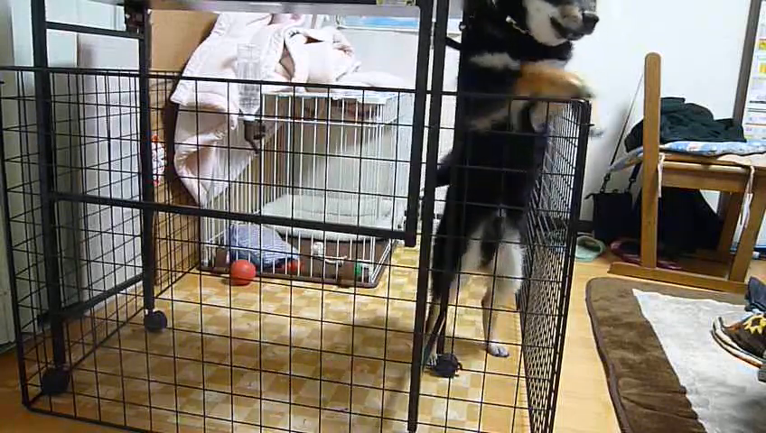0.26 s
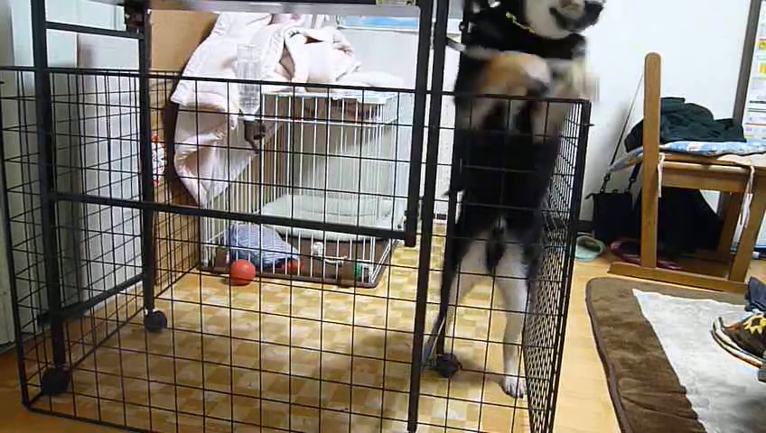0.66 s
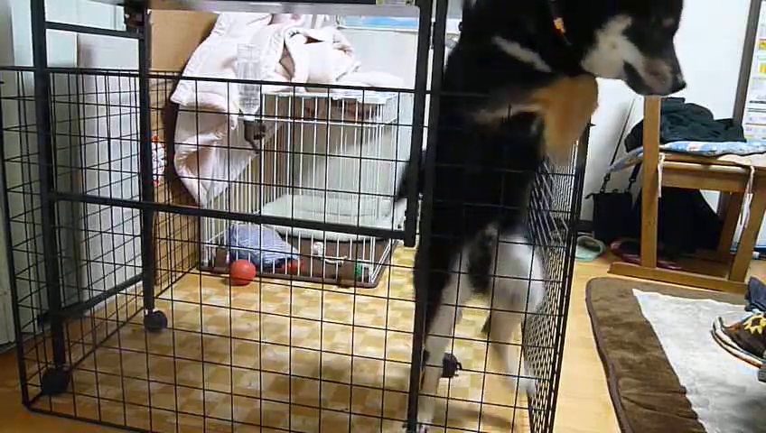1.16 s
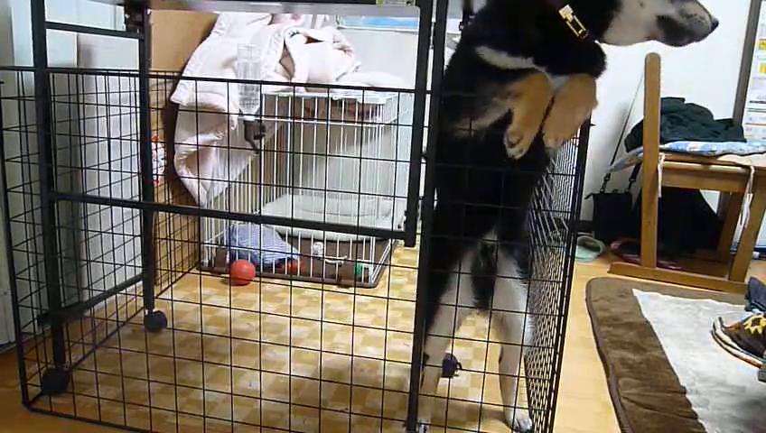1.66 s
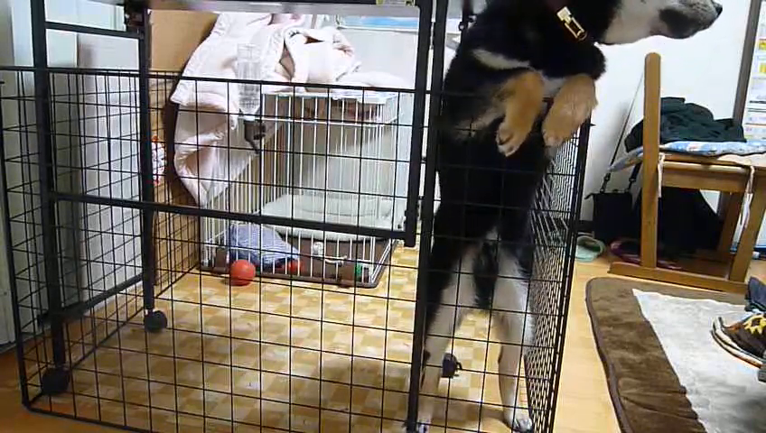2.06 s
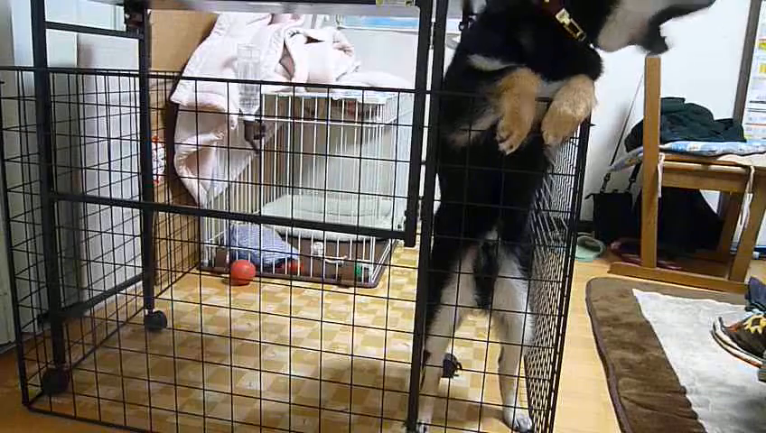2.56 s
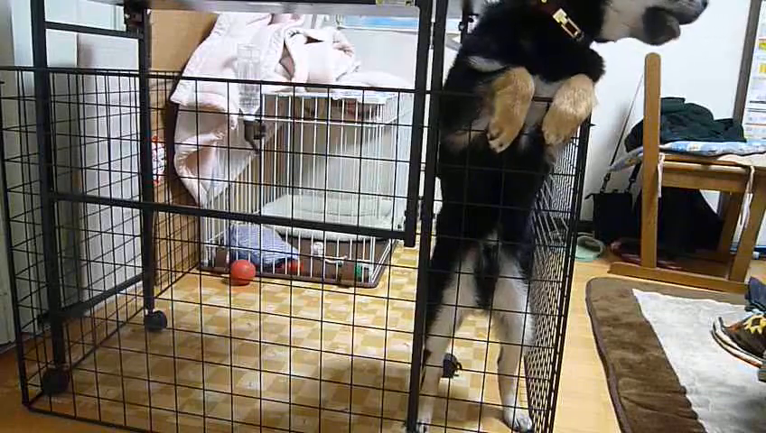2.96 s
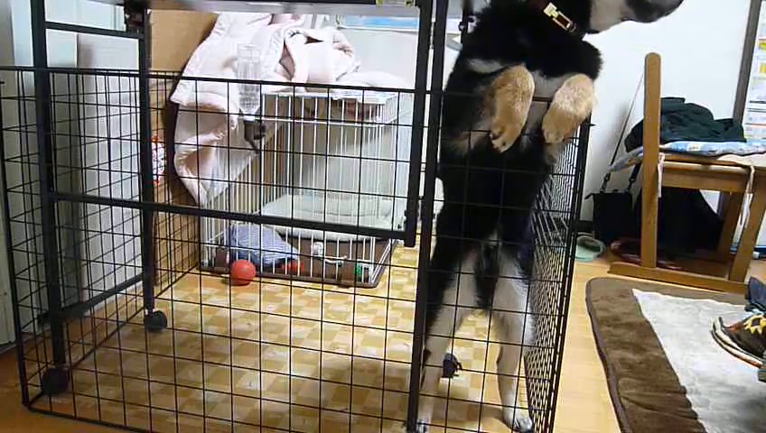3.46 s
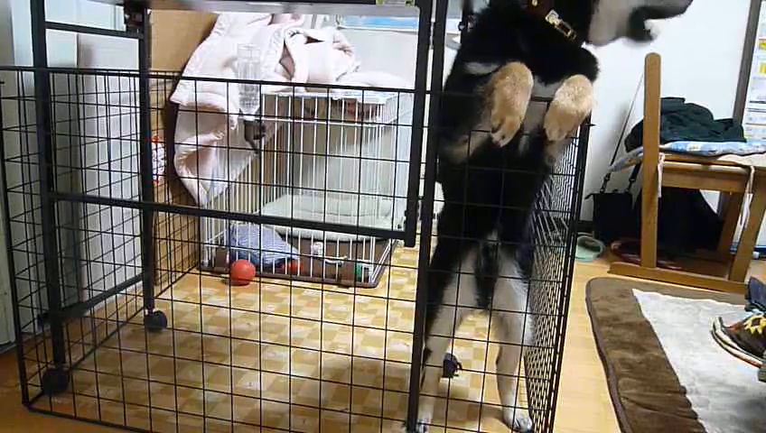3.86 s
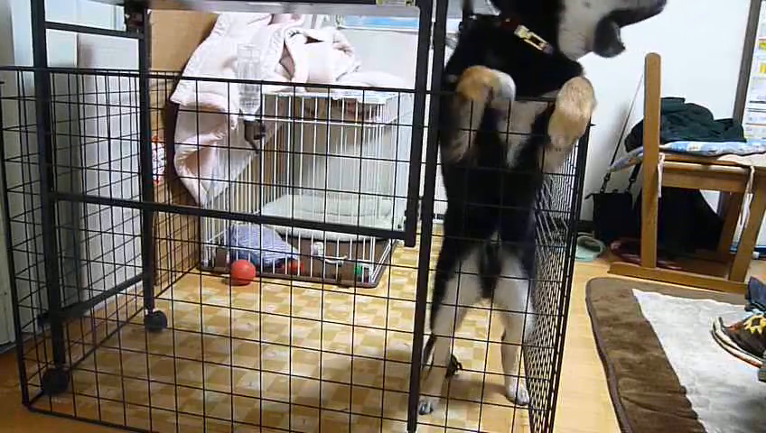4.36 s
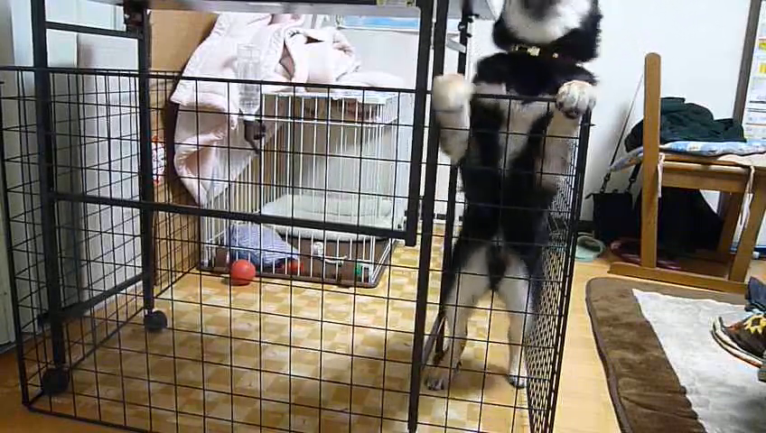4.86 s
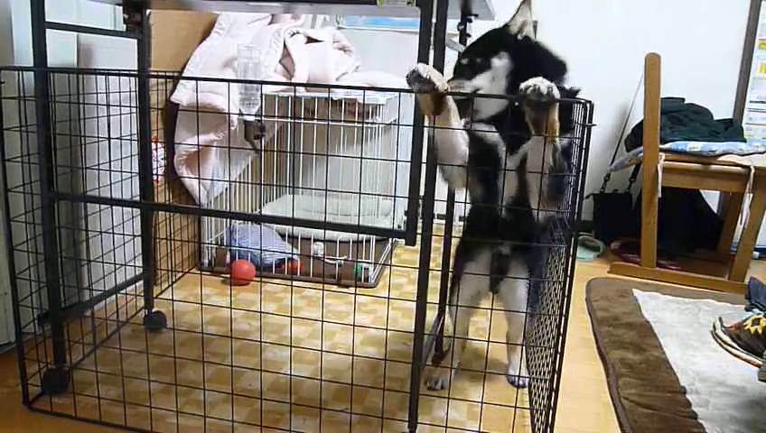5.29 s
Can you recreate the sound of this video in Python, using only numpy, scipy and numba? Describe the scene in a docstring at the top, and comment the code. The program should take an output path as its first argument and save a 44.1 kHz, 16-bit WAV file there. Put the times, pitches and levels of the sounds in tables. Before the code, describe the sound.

Close mono pickup of a puppy in a small room: short, pure, whistling whines around a paw thump and rubbing on the pen, then a brief nose whistle and near silence. A hoarse yelp bursts out, followed by another that slides down into a lower, cracking moan. Later, rapid strained yelps and whines run together, then a final dropping cry and soft bumps. Loud peaks sound squashed, with little very high treble.

```python
"""A puppy whines, yelps and howls while standing up against its wire pen in a small room.
Its voice is a stack of sine overtones that gains jitter and rasp when it pushes hard; a thin nose whistle joins once.
Its paws bump the pen (noise bursts ring low modes) and scuff it (strokes of hiss and rumble), over faint still air.
The room adds short echoes, and the recorder's limiter flattens the loud calls."""
import sys
import numpy as np
from scipy import signal
from scipy.fft import rfft, irfft, next_fast_len
from scipy.io import wavfile
from numba import njit

SR = 44100
rng = np.random.default_rng(int(sys.argv[2]) if len(sys.argv) > 2 else 0)


def generate_wav(sig):
    """Save sig (samples, or channels by samples) to the path in sys.argv[1] as 16-bit PCM at SR."""
    pcm = np.round(np.clip(np.atleast_2d(sig).T, -1, 1) * 32767).astype(np.int16)
    wavfile.write(sys.argv[1], SR, pcm)


N = 243873
T = np.arange(N) / SR  # time of every sample [s]

# Levels in the tables are relative: the functions that use them add their own trims.
# harsh barks: (start [s], hold [s], tail [s], pitch [Hz], last pitch [Hz], fundamental [dB],
# overtones [dB], roughness [share, limited to 1], opening push [dB])
BARK_EVENTS = [(1.844, 0.013, 0.024, 961, 958, -16.5, -19.5, 0.88, 8.5),
               (2.549, 0.076, 0.19, 938.5, 743, -13.5, -10.5, 0.57, 8),
               (3.885, 0.077, 0.076, 935, 934, -12.5, -12, 0.59, 7),
               (4.203, 0.057, .02, 954.6, 970, -12.5, -16, 0.52, 4),
               (4.93, 0.048, 0.13, 849, 642, -15, -20.5, 1.11, 1.5)]
# moments when a second, slower vibration splits the voice:
# (start [s], end [s], rate [share of the pitch], depth [share], roughness [0-1])
VOICE_SPLITS = [(1.86, 2, 0.25, 0.62, 0.29), (2.127, 2.168, 0.56, 0.056, 0), (2.894, 2.936, 0.13, 0.26, 0),
                (4.087, 4.164, 0.12, 0.18, 0.35), (4.385, 4.43, .27, 0.22, .22),
                (4.466, 4.529, 0.34, 0.44, .48)]
# colour of paws and fur rubbing, also of rattling wire: (frequency [Hz], level [dB])
RUB_COLOUR = [(260, -36), (450, -13.5), (637, 1), (879, -6.5), (1780, -2), (2020, -6), (2280, -4),
              (4140, -12), (6620, -10.5), (7500, -18), (8700, -32.5), (11300, -73.5), (19100, -120)]


def amp(db):
    """Turn decibels into gain."""
    return 10 ** (np.asarray(db) / 20)


def unit(x):
    """Scale to an rms of 1."""
    return x / np.sqrt(np.mean(x ** 2))


def colour_db(hz, points):
    """Read a spectrum between its points, on a log-frequency axis."""
    f, db = np.transpose(points)
    return np.interp(np.log(np.maximum(hz, 1)), np.log(f), db)


def noise(points):
    """Make noise of a given colour, with an rms of 1."""
    spectrum = rfft(rng.standard_normal(N))
    gain = amp(colour_db(np.fft.rfftfreq(N, 1 / SR), points))
    return unit(irfft(spectrum * gain, N))


def wander(n, hz):
    """Make random motion, mostly slower than hz, with a spread of 1."""
    lowpass = signal.butter(2, min(hz, SR / 4), fs=SR, output="sos")
    return unit(signal.sosfilt(lowpass, rng.standard_normal(n)))


def curves(rows, t):
    """Read the columns of a table at the times t."""
    s, *columns = np.transpose(rows)
    return [np.interp(t, s, column) for column in columns]


def gate(start, end, t, rise=0.0028, fall=0.0068):
    """Fade in from start and fade out from end; all times in seconds."""
    return np.clip((t - start) / rise, 0, 1) * np.clip(1 - (t - end) / fall, 0, 1)


def voice(whine_db=-2, bark_db=-2):
    """Whines and barks come from one throat and share one stream of turbulent air."""
    # colour of the rasp: (frequency [Hz], level [dB])
    rasp_colour = [(100, -21.5), (400, -36.5), (620, -34.5), (850, 6.5), (1150, -4), (1450, -4.5),
                   (1950, 4.5), (2400, 6), (3100, 6.5), (3800, -3.5), (4600, -17.5), (5800, -30.5),
                   (7200, -25), (9000, -47.5)]
    # course of each whine: (time [s], pitch [Hz], fundamental [dB], overtones [dB],
    # brightness: lift of the third harmonic and above [dB])
    whine_courses = [
        [(0.36, 1267, -36.5, -39.5, 2.5), (0.418, 1337, -13, -29, 8), (0.458, 1301, -24.5, -45, -6.5),
         (0.47, 1286, -29, -37, -4), (0.492, 1286, -36, -36.5, 5), (0.516, 1333, -11, -32.5, 4),
         (0.606, 1292, -26, -40.5, 2.5), (0.634, 1295, -26, -23, -12), (0.65, 1260, -19.5, -43, 9),
         (0.702, 1254, -17.5, -42, -5), (0.718, 1256, -18, -33.5, 14), (0.744, 1220, -13.5, -23, -14.5),
         (0.785, 1240, -24.5, -37.5, -11)],
        [(1.004, 950, -19, -36, 8), (1.018, 959, -17.5, -37, 3), (1.04, 1118, -17, -41.5, 7),
         (1.07, 1093, -22, -45.5, 5.5)],
        [(1.812, 1178, -14.5, -9.5, 3.5), (1.822, 1150, -18.5, -4.5, -4), (1.892, 1201, -35.5, -43, -2),
         (1.928, 1181, -34.5, -25, -5), (1.982, 1195, -27, -30, -2.5), (2.046, 1170, -32, -39, -9.5),
         (2.08, 1185, -22.5, -28, -13), (2.136, 1252, -24, -28, -3), (2.17, 1250, -36, -22.5, -5),
         (2.182, 1254, -19, -29, -15), (2.204, 1231, -29.5, -25.5, -5), (2.25, 1206, -24, -37.5, 3.5),
         (2.26, 1160, -28, -41, -5)],
        [(2.757, 724, -25, -27, 4.5), (2.781, 631, -13.5, -30.5, 13), (2.797, 645, -18.5, -29.5, 2.5),
         (2.821, 615.4, -14.5, -32.5, 3.5), (2.841, 599, -18.5, -29.5, 5.5), (2.863, 561.5, -35.5, -33, 0),
         (2.881, 541.3, -32.5, -27, -1), (2.903, 580, -27.5, -28, -4), (2.921, 615, -14.5, -22.5, -2.5),
         (2.959, 563, -40.5, -22.5, -11), (3.008, 590.5, -25.5, -20, -4.5)],
        [(3.013, 744, -20, -25, -6), (3.017, 771, -37.5, -29.5, -8), (3.059, 731.7, -16.5, -28.5, -11),
         (3.13, 760.4, -35, -61, 1)],
        [(4.015, 1354, -27.5, -38.5, -9), (4.045, 1171, -37.5, -17.5, -3.5), (4.085, 1146, -27, -27, 13),
         (4.117, 1013, -31, -14.5, -4.5), (4.131, 969.5, -17.5, -14, -4.5), (4.153, 972, -9.5, -23, 16.5),
         (4.185, 950, -18.5, -19.5, 6)],
        [(4.275, 1030, -31, -27, -3), (4.341, 1027, -17.5, -18.5, 1.5), (4.411, 1028, -19.5, -19.5, 1.5),
         (4.459, 970.4, -16, -25.5, 4), (4.485, 936, -38, -21.5, 5.5), (4.513, 874, -20.5, -23, 4.5),
         (4.523, 793, -38.5, -32.5, 10.5), (4.531, 801, -13, -24.5, 7), (4.549, 772, -20.5, -30, 10),
         (4.579, 922.6, -8.5, -25, 9.5), (4.621, 945.6, -7, -26.5, 12.5), (4.647, 1007, -17.5, -23.5, 6.5),
         (4.663, 1029, -37.5, -19.5, -7.5), (4.709, 1026, -27.5, -20, -7), (4.729, 1013, -32, -38, -4),
         (4.737, 1027, -20, -25, -8.5), (4.8, 1031, -27.5, -31.5, -9)],
        [(5.02, 655.6, -21.5, -33.5, -4), (5.078, 683.4, -42, -43, -3.5), (5.162, 693, -38.5, -57, 12),
         (5.175, 770, -36.5, -57, -15)],
    ]
    # tone of each whine, in the same order: (overtones above the third [dB],
    # level of the overtones ringing in the nose [dB], least roughness [0-1])
    whine_tones = [(2.5, -62, 0.08), (-3, -82, 0.1), (-7, -68, 0.07), (-1.5, -71.5, 0.07), (-2, -59, 0.24),
                   (0, -60.5, 0.32), (1.5, -68.5, 0.04), (9, -79, 0.24)]
    turbulence = noise(rasp_colour)
    whines = sum(whine(rows, tone, turbulence) for rows, tone in zip(whine_courses, whine_tones))
    barks = sum(bark(row, turbulence) for row in BARK_EVENTS)
    return amp(whine_db) * whines + amp(bark_db) * barks


def whine(rows, tone_colour, turbulence):
    """A sung note slides along its course of pitch and loudness."""
    start, end = rows[0][0], rows[-1][0]
    return note(start, end, lambda t: curves(rows, t), tone_colour, turbulence, overtones_db=-2, rasp_db=0)


def bark(row, turbulence, lift_db=2, bright_db=0, nasal_db=-68):
    """A burst of pressure starts loud and sharp, sags while held, then fades with a late slide in pitch."""
    start, hold, tail, hz, last_hz, first_db, effort_db, rough, push_db = row
    push_s, sharp_share = 0.0063, 0.045  # the opening push also raises the pitch by this share
    sag_db_per_s, fade_db = 49.5, 23

    def course(t):
        """Pitch and levels follow from the age of the bark."""
        age = t - start
        push = np.exp(-age / push_s)
        fade = np.clip((age - hold) / tail, 0, 1)
        db = push_db * push - sag_db_per_s * age - fade_db * fade
        pitch_hz = hz * (1 + sharp_share * push) + (last_hz - hz) * fade ** 3
        return pitch_hz, first_db + db, effort_db + db, lift_db

    end = start + hold + tail
    return note(start, end, course, (bright_db, nasal_db, rough), turbulence, overtones_db=-14.5, rasp_db=10.5)


def note(start, end, course, tone_colour, turbulence, overtones_db, rasp_db, jitter=0.062, shimmer=0.52,
         flutter_db=6, rasp_share=.15, coarse_db=1.0):
    """The vocal folds make harmonics, which shake and mix with turbulence as the voice turns rough."""
    during = (T > start) & (T < end + .03)
    t = T[during]
    n = len(t)
    hz, first_db, effort_db, lift_db = course(t)
    least_rough = tone_colour[2]
    first, effort = amp(first_db), amp(effort_db + overtones_db)
    rough = roughness(t, least_rough)
    # uneven cycles smear the high harmonics first, as each multiplies this phase
    waver = .003 * wander(n, 60) + jitter * rough * wander(n, 240)
    phase = 2 * np.pi * np.cumsum(hz * (1 + waver)) / SR
    overtones = np.zeros(n)
    for k, gain in enumerate(overtone_gains(hz, effort, lift_db, tone_colour), 2):
        # in a hoarse voice each overtone swells and fades by itself
        flutter = amp(flutter_db * rough * wander(n, 33))
        overtones += gain * flutter * np.sin(k * phase)
    # the slower vibration puts side lines around the harmonics, mostly the overtones
    drift = .5 * wander(n, 5.4)
    split = sum(depth * gate(on, off, t) * np.sin(share * phase + drift)
                for on, off, share, depth, _ in VOICE_SPLITS)
    beat = split + shimmer * rough * wander(n, 100)
    tone = first * np.sin(phase) * (1 + beat / 2) + overtones * (1 + beat)
    # air escapes in one puff a cycle, and the puffs come in ragged bunches
    bunches = unit(amp(coarse_db * wander(n, 160)))
    puffs = turbulence[during] * (1 + 0.12 * np.sin(phase)) * bunches
    rasp = amp(rasp_db) * rough * np.hypot(rasp_share * first, effort) * puffs
    out = np.zeros(N)
    out[during] = (np.sqrt(2) * tone + rasp) * gate(start, end, t, rise=0.0026)
    return out


def overtone_gains(hz, effort, lift_db, tone_colour, patchy_db=4):
    """Throat and nose resonances set the strength of harmonics 2 to 13."""
    # resonances of throat and mouth: (frequency [Hz], level [dB])
    throat_colour = [(1600, -10.5), (1850, -4), (2300, -10), (2650, -17.5), (2950, -3), (3350, -20.5),
                     (4100, -24), (4700, -31.5), (5300, -51.5), (7400, -43.5), (8500, -68.5)]
    # resonance of the nose: (frequency [Hz], level [dB])
    nose_colour = [(4000, -25), (5000, -7), (6200, 6), (7000, 0.5), (8500, -40.5)]
    bright_db, nasal_db, _ = tone_colour
    # the throat shortens for high notes: its resonances rise as (pitch / rest) to a small power
    rest_hz, follow_power = 700, 0.099
    throat_hz = hz / (hz / rest_hz) ** follow_power
    # the second and third harmonics share the effort as they slide through the resonances
    pair = amp([colour_db(2 * throat_hz, throat_colour), colour_db(3 * throat_hz, throat_colour) + lift_db])
    second, third = effort * pair / np.hypot(*pair)
    gains = [second, third]
    for k in range(4, 14):
        from_throat = effort * amp(bright_db + lift_db + colour_db(k * throat_hz, throat_colour))
        from_nose = amp(nasal_db + colour_db(k * hz, nose_colour))
        # short waves beam, so the highest overtones come and go as the head moves
        gains.append((from_throat + from_nose) * amp(patchy_db * wander(len(hz), 14)))
    return gains


def roughness(t, least):
    """The folds turn chaotic in a bark and settle soon after; a split roughens them too."""
    recover_s = 0.038
    barks = [rough * (t >= s) * np.exp(-np.maximum(t - s - hold, 0) / recover_s)
             for s, hold, *_, rough, _ in BARK_EVENTS]
    splits = [rough * gate(on, off, t) for on, off, *_, rough in VOICE_SPLITS]
    return np.clip(np.max(barks + splits, axis=0), least, 1)


def nose_whistle(waver=.013):
    """Air through the nose gives a faint, unsteady whistle that slides down, then turns up as it fades."""
    # course of the whistle: (time [s], pitch [Hz], level [dB])
    whistle_course = [(1.155, 7560, -44), (1.174, 6960, -36.5), (1.195, 6510, -35), (1.232, 6950, -52)]
    hz, db = curves(whistle_course, T)
    phase = 2 * np.pi * np.cumsum(hz * (1 + waver * wander(N, 348))) / SR
    return amp(db) * gate(whistle_course[0][0], whistle_course[-1][0], T) * np.sin(phase)


def bumps(contact_s=0.041, rattle_s=0.019, thud_db=-3):
    """A soft paw rings the low modes of pen and floor, and the wires chatter."""
    # paws landing on pen and floor: (time [s], thud [dB], wire rattle [dB])
    landings = [(0.412, -36.5, -59), (0.706, -29, -34.5), (0.746, -57, -64), (0.994, -40, -47),
                (2.456, -67, -68), (4.56, -51, -68), (5.205, -42.5, -79), (5.476, -39.5, -51),
                (5.508, -42, -54)]
    # what pen and floor ring with: (frequency [Hz], level [dB], time to fall by 60 dB [s])
    pen_modes = [(70, -11, 0.22), (127, -3.5, 0.17), (148, -8, 0.036), (240, -3, 0.22), (260, 18, 0.013),
                 (473, -19.5, .1), (530.5, -3.5, 0.037)]
    t = T[:SR // 2]
    body = sum(amp(db - 60 * t / t60) * np.sin(2 * np.pi * hz * t) for hz, db, t60 in pen_modes)
    thuds, chatter = np.zeros(N), np.zeros(N)
    for s, blow_db, rattle_db in landings:
        age = np.maximum(T - s, 0)
        thuds += amp(blow_db) * (T > s) * np.exp(-age / contact_s)
        chatter += amp(rattle_db) * (T > s) * np.exp(-age / rattle_s)
    force = thuds * rng.standard_normal(N) / np.sqrt(contact_s * SR)
    ringing = amp(thud_db) * signal.fftconvolve(force, body)[:N]
    rattle = chatter * noise(RUB_COLOUR) * amp(4.1 * wander(N, 300))
    return ringing + rattle


def scuffs(hiss_db=8, rumble_db=-3, grain_db=1.0, rise_s=0.027, fade_s=0.098):
    """Rubbing catches and slips: a grainy hiss, and a rumble from the shaken pen."""
    # paws and fur rubbing on pen and floor: (start [s], time until the fade [s], hiss [dB], rumble [dB])
    strokes = [(0, 0.33, -64.5, -49.5), (0.262, .07, -58.5, -55.5), (0.342, 0.072, -52.5, -41.5),
               (0.54, 0.13, -61.5, -47.5), (0.699, 0.013, -53, -37), (0.851, 0.096, -48.5, -37),
               (0.998, 0.13, -64.5, -48), (1.139, 0.07, -49.5, -44), (1.358, 0.045, -49, -38.5),
               (1.533, 0.28, -69.5, -52), (2.439, 0.044, -58, -49), (5.491, .05, -50, -33.5)]
    # colour of the shaken pen: (frequency [Hz], level [dB])
    rumble_colour = [(18, -47.5), (30, -10), (102, 5), (189, -3), (309, -0.5), (363, -6.5), (491, 0.5),
                     (600, -5.5), (780, -53.5), (1320, -120)]
    hiss = noise(RUB_COLOUR) * amp(hiss_db + grain_db * wander(N, 120))
    rumble = noise(rumble_colour) * amp(rumble_db)
    out = np.zeros(N)
    for s, hold, rub_db, shake_db in strokes:
        rise = np.clip((T - s) / rise_s, 0, 1)
        stroke = rise * np.exp(-np.maximum(T - s - hold, 0) / fade_s)
        out += stroke * (amp(rub_db) * hiss + amp(shake_db) * rumble)
    return out


def still_air(level_db=-54.5):
    """The quiet room gives a faint noise whose level drifts slowly."""
    # colour of the still air: (frequency [Hz], level [dB])
    air_colour = [(18, -29.5), (30, -17), (43, -18.5), (254, -19.5), (542, -18.5), (981, -20.5),
                  (1080, -20.5), (1270, -23), (2100, -25.5), (6700, -31.5), (8700, -46.5), (11300, -58),
                  (19100, -120)]
    return noise(air_colour) * amp(level_db + .5 * wander(N, 2.1))


def room(x, t60=0.28, wet_db=-4):
    """Eight echo paths between the walls scatter into each other, solved per frequency."""
    # travel time of each echo path: (time [s])
    path_times = np.array([.0071, .0097, .0127, .0151, .0187, .0223, .0269, .0317])
    size = next_fast_len(N + SR)
    hz = np.fft.rfftfreq(size, 1 / SR)
    path = np.asarray(path_times)[:, None]
    trip = np.exp(-path * (np.log(1000) / t60 + 2j * np.pi * hz))  # loss and delay of one trip
    loops = trip / (1 - trip)  # all repeated trips added up
    # paths leave with alternating sign; the divisor is their scattering into each other
    echoes = (loops[::2].sum(axis=0) - loops[1::2].sum(axis=0)) / (1 + 2 * loops.mean(axis=0))
    echoes = echoes / np.sqrt(np.mean(np.abs(echoes) ** 2))
    return amp(wet_db) * irfft(rfft(x, size) * echoes, size)[:N]


def scene(direct_db=2.0):
    """The puppy and its pen are heard directly and off the walls, over the still air of the room."""
    near = voice() + nose_whistle() + scuffs() + bumps()
    return (amp(direct_db) * near + room(near) + still_air())[None]


@njit
def follow(x, attack, release):
    """Follow the peaks: rise fast and sink slowly."""
    out, level = np.empty(len(x)), 0.
    for i in range(len(x)):
        size = abs(x[i])
        level += (size - level) * (attack if size > level else release)
        out[i] = level
    return out


def record(dry, ceiling_db=-10, attack_s=.0015, release_s=0.077, top_hz=8200, offset=-.0573):
    """A limiter lets the first cycles of a yelp through, then holds it down; the top is cut, the zero line low."""
    envelope = follow(dry[0], 1 / (attack_s * SR), 1 / (release_s * SR))
    held = dry / np.maximum(envelope / amp(ceiling_db), 1)
    lowpass = signal.ellip(8, .2, 70, top_hz, fs=SR, output="sos")
    return signal.sosfilt(lowpass, held) + offset


dry = scene()
out = record(dry)
generate_wav(out)
```